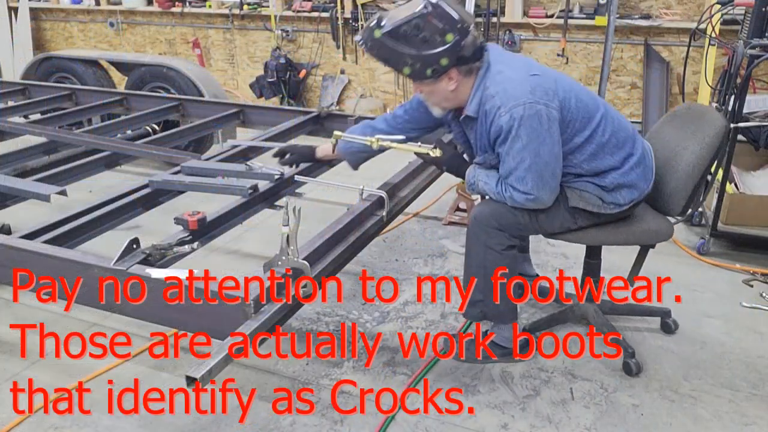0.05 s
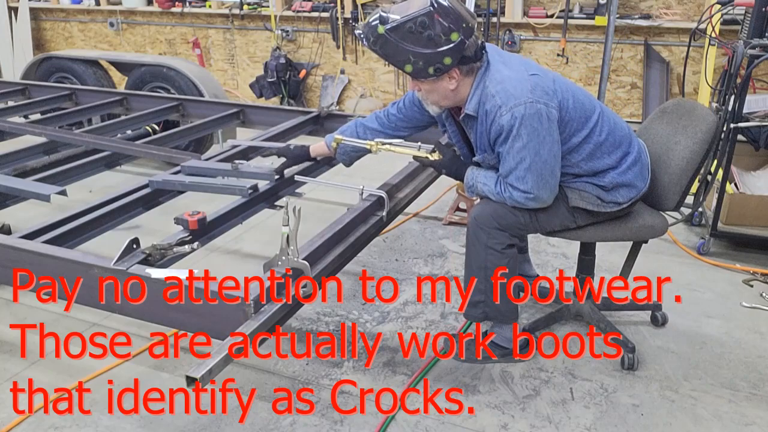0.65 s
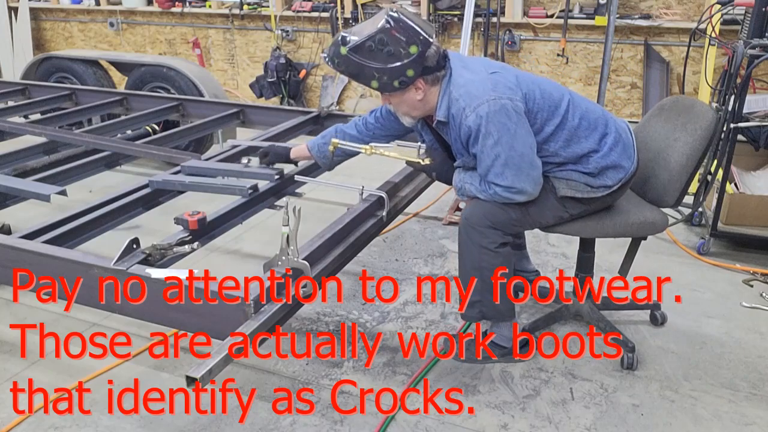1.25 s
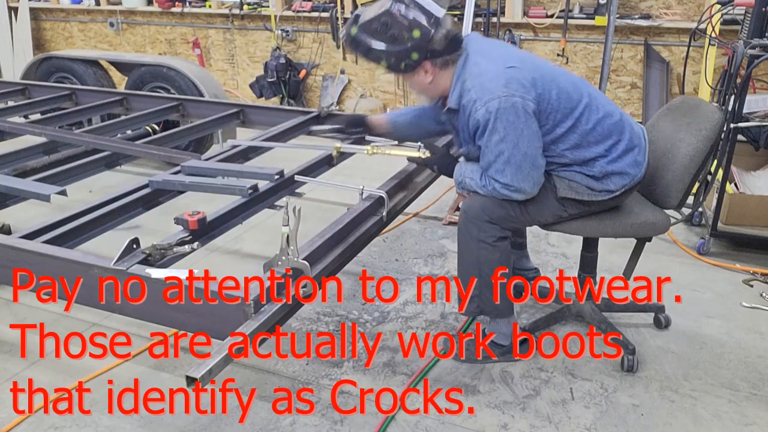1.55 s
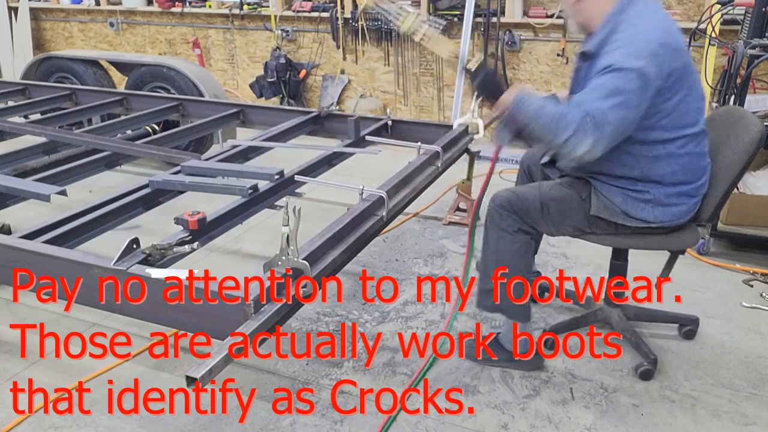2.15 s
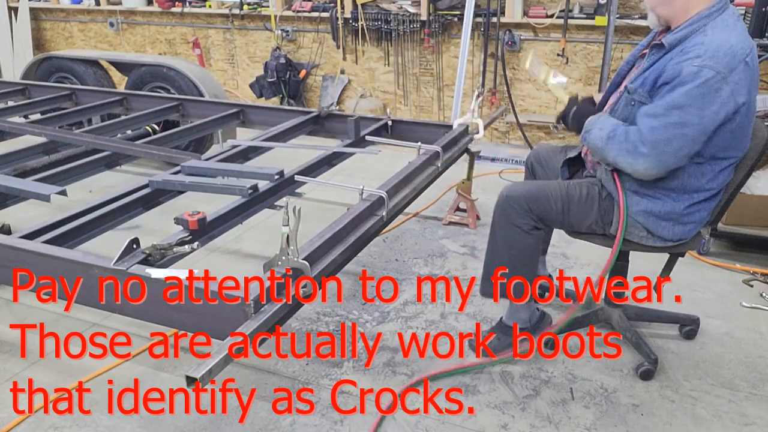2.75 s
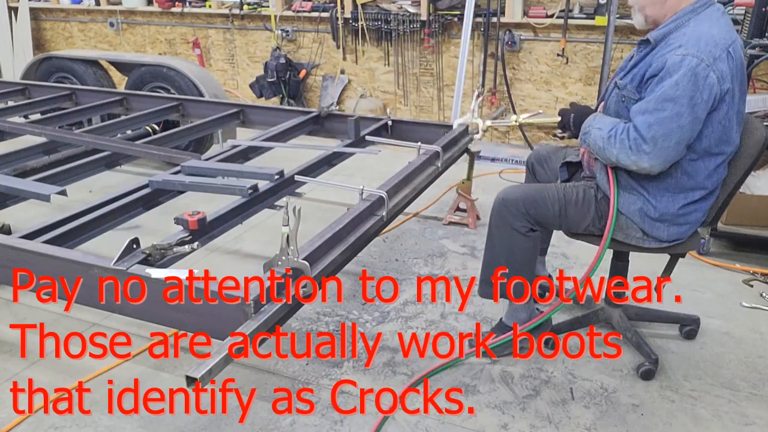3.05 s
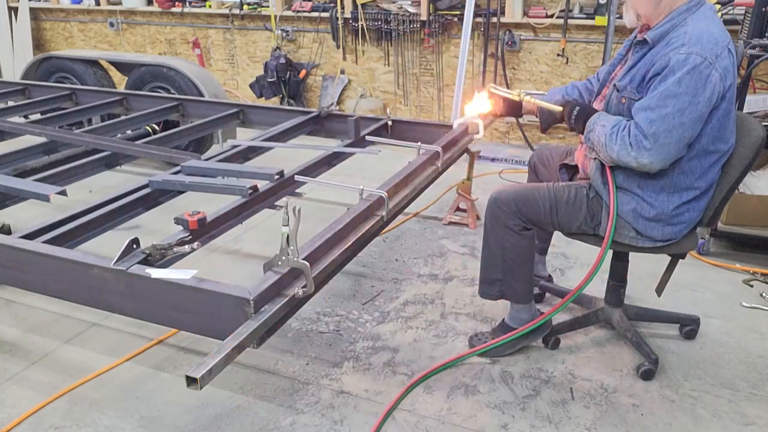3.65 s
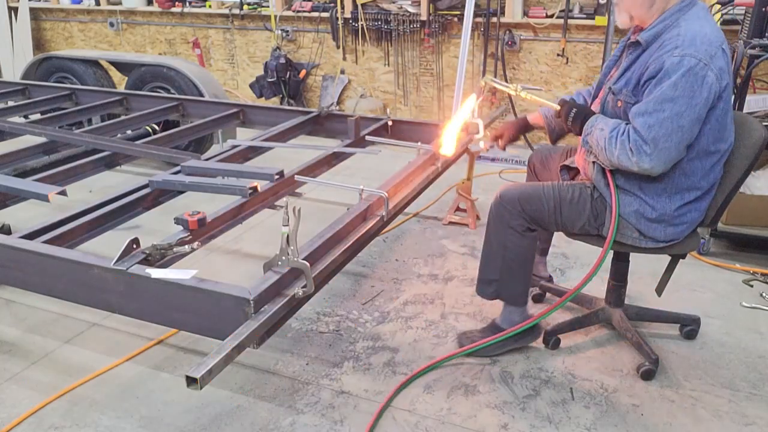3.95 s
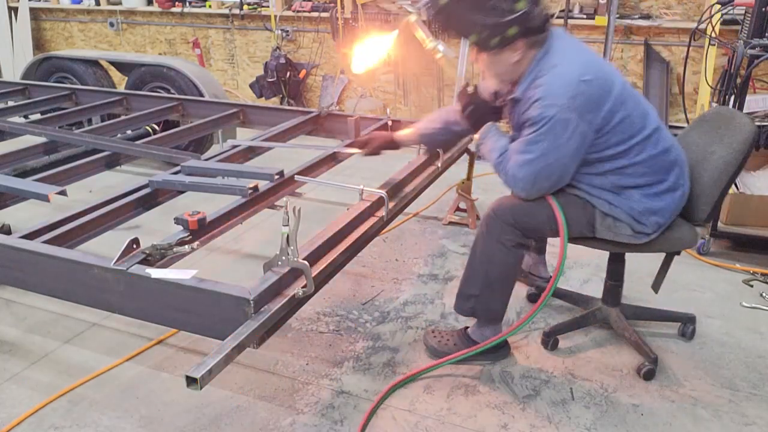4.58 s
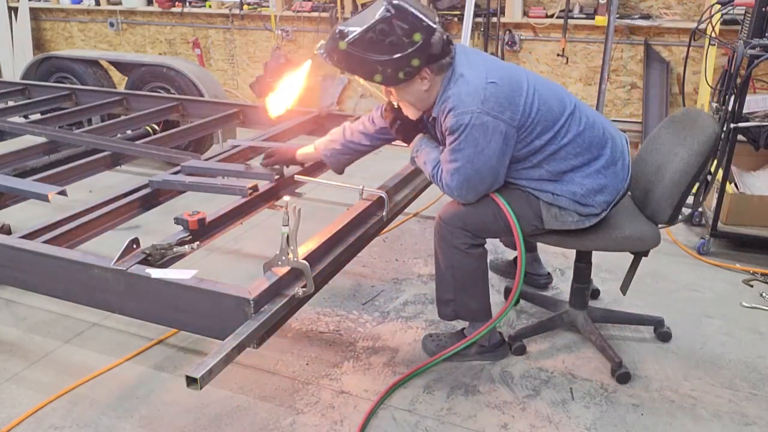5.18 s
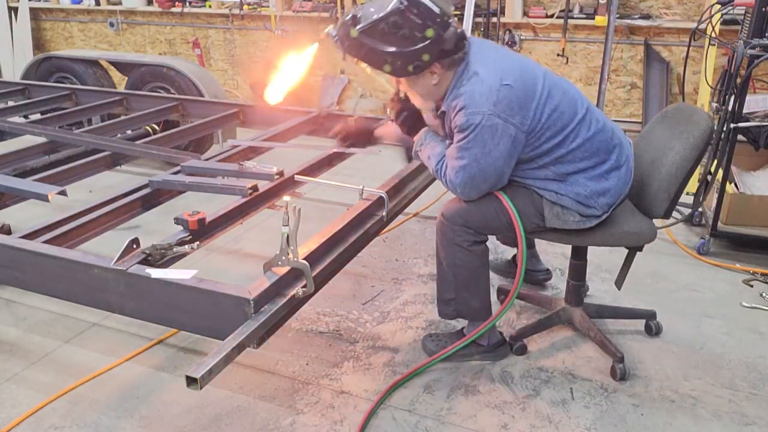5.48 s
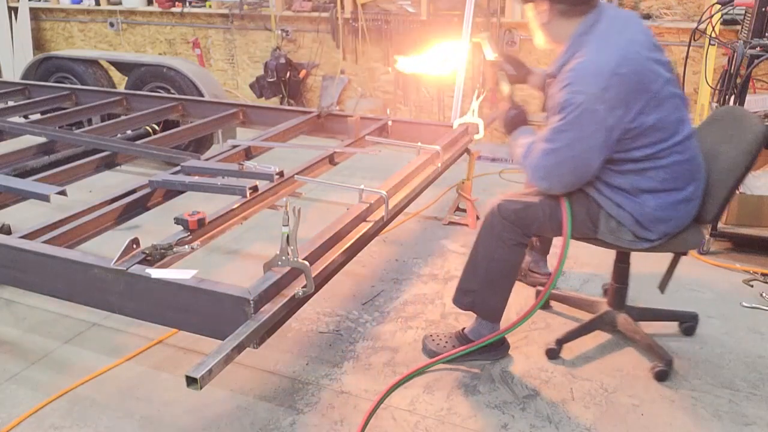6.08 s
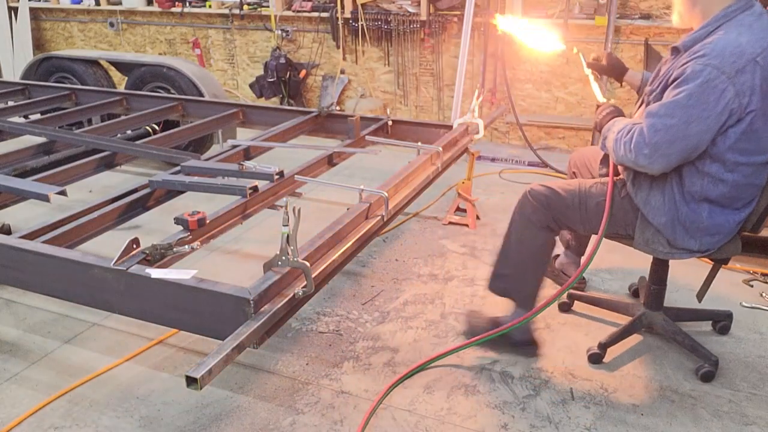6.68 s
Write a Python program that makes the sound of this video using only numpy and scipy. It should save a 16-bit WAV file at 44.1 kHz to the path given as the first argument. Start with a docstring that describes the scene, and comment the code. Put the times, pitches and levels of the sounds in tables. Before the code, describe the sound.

A steel bar clinks in a workshop, then a cutting torch lights with a loud pop, flutters and opens to a rushing hiss.

```python
"""A workshop, heard from a few metres away with plenty of room. A gas hose drags over the floor, a chair
rolls back on its casters, and a steel bar slides and drops ringing on a steel frame while fittings tick.
A flint striker rasps and snaps, and a cutting torch lights with a loud pop. Its loose yellow flame
flutters and roars, the bar is nudged once more, and the valve opens to a rushing hiss."""
import sys
import numpy as np
from scipy import signal
from scipy.fft import rfft, irfft
from scipy.io import wavfile
from scipy.ndimage import uniform_filter1d

SR = 44100
rng = np.random.default_rng(int(sys.argv[2]) if len(sys.argv) > 2 else 0)


def transcribe(signal):
    """Save signal, clipped to [-1, 1], as a 16-bit WAV file at the path in sys.argv[1]."""
    frames = np.atleast_2d(signal).T
    limited = np.clip(frames, -1, 1)
    pcm = np.round(limited * 32767).astype(np.int16)
    wavfile.write(sys.argv[1], SR, pcm)


N = 305270
T = np.arange(N) / SR
RING = T[:SR]  # one second for each hit to ring out

# room tone: (frequency [Hz], level [dB])
ROOM_TONE = [(15, -26.5), (25, -10.5), (49, -3), (108, -13.5), (127, -7), (236, -17), (427, -23.5),
             (4490, -37.5), (11300, -29.5), (16000, -45)]
# sweeps of hose and sleeves, and at 3.9 s the striker's hiss dying away in the room:
# (time [s], length [s], rub [dB], swish [dB])
SWEEPS = [(-.06, 0.63, -68, -66.5), (.9, 0.42, -65, -76), (1.5, 0.048, -50, -46.5),
          (1.62, .08, -48.5, -51.5), (1.75, 0.45, -52, -53), (2.16, .12, -47.5, -46.5),
          (2.48, 0.087, -61, -54), (2.6, 0.23, -60, -64), (2.7, 0.083, -49.5, -49.5),
          (3.9, 0.15, -49.5, -55), (4.135, 0.04, -46, -44), (4.55, 0.39, -54.5, -56.5),
          (4.92, 0.042, -56, -47.5), (5.67, 0.2, -64, -59), (6.75, .09, -41, -40.5)]
# their dull rub and bright swish: (frequency [Hz], level [dB])
RUB_EQ = [(250, -10), (480, -2), (800, -1.5), (1400, -3), (2000, -1.5), (2700, -6.5), (4000, -16)]
SWISH_EQ = [(1180, -31), (2000, -13.5), (3010, -3), (4410, -1), (5780, -3), (6590, 0), (8120, -15.5),
            (11100, -5), (15100, -7), (16000, -28)]

# low rumble of casters and, once lit, of the swelling flame: (time [s], length [s], rumble [dB], grit [dB])
LOW_SWELLS = [(.05, 0.33, -62.5, -59), (1.52, 0.033, -46, -72), (1.75, 0.33, -50, -52.5),
              (2.76, 0.1, -60, -56), (4.42, 0.07, -47, -59), (4.62, 0.4, -50, -49), (5.7, .18, -62, -56.5),
              (5.86, 0.52, -44.5, -43.5)]
# that rumble and the grit on top: (frequency [Hz], level [dB])
LOW_SWELL_EQ = [(21, -47), (35, -19), (70, -1.5), (213, -7.5), (258, -5.5), (291, -2.5), (523, -7.5),
                (591, -10.5), (900, -17.5), (1170, -55), (1980, -120)]
GRIT_EQ = [(700, -24), (1300, -16), (2050, -4.5), (2600, -14.5), (4000, -25)]
# bumps and creaks of the seat: (time [s], level [dB], pitch [Hz], t60 [s])
BUMPS = [(.091, -48, 1735, 0.04), (.108, -50.5, 1720, 0.14), (1.54, -53, 210, 0.98),
         (1.73, -50, 1880, 0.95), (1.86, -53, 370, 0.22), (2.055, -40.5, 75, 0.39),
         (2.06, -47.5, 510, 0.55), (2.668, -58, 2070, 0.35), (2.72, -55.5, 676, 0.47),
         (2.8, -51.5, 1940, 0.79), (2.83, -59, 140, 0.42)]

# pushes that slide the bar over the frame: (time [s], length [s], grind [dB], scratch [dB])
PUSHES = [(.268, 0.14, -38.5, -40), (.40, .26, -49.5, -38), (.66, 0.17, -53, -62.5),
          (1.085, 0.076, -46.5, -33.5), (1.19, 0.053, -45.5, -49.5), (5.125, 0.18, -43.5, -47)]
# hits and bounces: (time [s], bar [dB], frame [dB], contact [0 end to 1 flank], cut-off [Hz])
BLOWS = [(0.2788, -12, -24.5, 0.0047, 1520), (.425, -19.5, -40, 0.35, 10000),
         (1.077, -19.5, -42.5, 0.18, 4940), (1.318, 2, -30, 0.065, 19700), (1.352, -3, -33.5, 0.095, 19900),
         (5.136, -3, -35.5, 0.56, 3240), (5.2805, 0.5, -34, 0.71, 20000), (5.296, -4.5, -37.5, 0.76, 20000)]
# the bar's free ring: (frequency [Hz], t60 [s], struck on its end [dB], struck on its flank [dB])
BAR_MODES = [(684, 1.2, -49, -44), (1200, 1.2, -50, -47), (2169, 0.82, -25.5, -52), (2191, 1.2, -42, -55),
             (2466, 1.2, -52, -47), (3040, 0.88, -41, -47), (3260, 0.94, -50, -42), (3660, 0.68, -44, -42),
             (3905, 0.83, -38, -45), (4225, 0.96, -42, -40), (4560, 0.61, -39, -51), (4845, 0.8, -52, -50),
             (5389, 0.84, -40, -34), (5895, 0.57, -34, -50), (6105, 0.89, -32, -37), (6255, 0.62, -30, -42),
             (6745, 0.59, -34, -44), (6820, 0.97, -28, -52), (7009, 0.58, -47, -39), (7393, 0.63, -34, -40),
             (8076, 0.57, -34, -42), (8419, 0.58, -45, -52), (9551, 0.42, -32, -38),
             (10378, 0.48, -38, -38), (10698, 0.54, -41, -41), (11260, 0.49, -45, -37),
             (12205, 0.53, -45, -44), (12820, 0.56, -41, -41), (15400, 0.69, -55, -51),
             (15738, 0.53, -41, -48)]
# the crack of steel on steel, and the wash of weaker modes in bar and frame: (frequency [Hz], level [dB])
CRACK_EQ = [(200, -29.5), (1000, -10.5), (4000, -5.5), (8000, -2), (11000, 2.5), (15000, 0.5)]
FRAME_EQ = [(60, -33.5), (160, -5), (700, -6.5), (1300, -1), (1850, -3.5), (2300, -0.5), (4400, 0.5),
            (5100, -5.5), (6600, 3.5), (9000, -9.5), (10500, -3), (11800, -13), (13800, -2.5),
            (15000, -1.5)]
# decay of that wash: (frequency [Hz], t60 [s])
FRAME_T60 = [(150, 1.0), (2000, 1), (7000, 0.71), (15000, 0.16)]
# bar modes that sing under friction or ring on after a drop:
# (time [s], frequency [Hz], relative level [dB], swell [s])
SINGING = [(.28, 2191, -45, .01), (.44, 2466, -47, .24), (.47, 9551, -52, .03), (.5, 4845, -51, .2),
           (.5, 3260, -53, .15), (.55, 684, -53, .12), (.575, 2191, -49, .02), (1.1, 4560, -45, .05),
           (1.11, 7009, -47, .06), (1.11, 10698, -45, .06), (1.45, 2169, -42, .1), (5.135, 684, -50, .03),
           (5.135, 1200, -50, .02), (5.14, 3260, -47, .03), (5.15, 5895, -50, .03)]

# the clearest ticks of fittings and hose: (time [s], level [dB])
TICKS = [(1.0572, -46.5), (1.7712, -33.5), (1.786, -40.5), (1.9144, -34), (2.0538, -36), (2.774, -34),
         (3.109, -52), (4.145, -39), (4.8662, -30.5), (4.969, -21.5), (5.9632, -38), (6.0797, -30),
         (6.2103, -29)]
# tone of one tick: (frequency [Hz], level [dB])
TICK_EQ = [(1000, -5), (3000, -5.5), (5000, -3.5), (7200, -3), (9200, -4), (10600, 2.5), (12000, 4),
           (15000, 2)]
TICK_T60 = 0.018

# strokes of the flint over the file: (time [s], length [s], level [dB])
STROKES = [(3.63, 0.047, -50.5), (3.672, 0.079, -38), (3.872, 0.0027, -25), (3.885, 0.053, -41)]
# snaps of the striker's spring: (time [s], level [dB], t60 [s])
SNAPS = [(3.638, -61, 0.066), (3.702, -39, .04), (3.8434, -25.5, 0.036), (3.869, -22, 0.027)]
# ring of its cup and spring: (frequency [Hz], width [Hz], relative level [dB])
STRIKER_MODES = [(7200, 190, -5), (7860, 330, -27), (10400, 230, -10), (12230, 370, -23),
                 (14200, 210, -2.5)]

LIGHT_S = 3.689  # the gas catches
# attack and tail of the pop: (frequency [Hz], level [dB])
POP_CRACK_EQ = [(30, -27), (60, 11), (200, -26), (550, -7), (1500, -22), (5000, -30), (12000, -46)]
POP_TAIL_EQ = [(25, -26), (65, -13), (95, -13.5), (140, -3), (260, -19.5), (450, -7), (770, -20.5),
               (1050, -18.5), (1600, -27.5), (4400, -32.5), (9000, -45.5), (15000, -50)]
# decay of the tail: (frequency [Hz], t60 [s])
POP_T60 = [(60, 0.9), (170, 0.78), (450, 1), (1300, 0.68), (4000, 1), (12000, 0.44)]
# low room modes kicked by the pop: (frequency [Hz], relative level [dB], t60 [s])
BOOM_MODES = [(70.9, 1.5, 0.36), (131.6, -0.5, 0.62), (147.7, 2.5, 0.41), (181.8, -3, 0.54)]
# gas rushing from the tip: (frequency [Hz], level [dB])
HISS_EQ = [(1290, -10), (2200, -4.5), (2690, -7), (2890, -5.5), (3140, -7), (5960, -7.5), (6370, -6),
           (7900, -16), (12300, -10), (15100, -11.5), (16000, -33)]

# the flame's roar, growing as the torch is swung: (time [s], level [dB])
ROAR_LEVEL = [(3.95, -48.5), (4.12, -59), (4.4, -53), (4.53, -45.5), (4.62, -44), (4.72, -42.5),
              (4.85, -41.5), (5.0, -43), (5.13, -45.5), (5.36, -47), (5.63, -47.5), (5.762, -44),
              (5.87, -39), (6.27, -39), (6.6, -40), (6.92, -39.5)]
# its body, tearing edge and low rumble: (frequency [Hz], level [dB])
ROAR_EQ = [(110, -63), (190, -1), (260, -3.5), (335, 1.5), (450, -3.5), (560, -7.5), (720, -8.5),
           (880, -19), (1100, -18.5), (1600, -21.5), (2200, -25.5), (4000, -43)]
TEARING_EQ = [(400, -1.5), (800, 13.0), (1500, 7.0), (2100, -14), (3200, -17.0), (8000, -22)]
RUMBLE_EQ = [(25, -18), (42, -11), (56, -8.5), (66, 3.5), (78, -1.5), (90, -8.5), (115, -3), (128, 5.5),
             (160, 0), (185, -30), (260, -36)]

# tone of the reverb on small metal: (frequency [Hz], level [dB])
REVERB_EQ = [(100, -16), (15000, -1.0)]
# its decay: (frequency [Hz], t60 [s])
REVERB_T60 = [(100, 0.51), (1000, 1), (5000, 0.76), (15000, 0.17)]
# stereo width of the room: (frequency [Hz], side minus mid [dB])
WIDTH = [(60, -7.5), (130, -15.5), (250, -12.5), (500, -8), (1000, -1), (4000, -0.5), (12000, -0.5)]
# stereo balance: (frequency [Hz], left minus right [dB])
BALANCE = [(60, 2), (125, 1), (250, 1.5), (1000, 2), (2000, 2), (4400, 3.5), (8000, 1), (13000, 0.5)]


def amp(db):
    """Decibels to gain."""
    return 10 ** (np.asarray(db) / 20)


def unit(x):
    """Scale to rms 1."""
    return x / np.sqrt(np.mean(x ** 2))


def along(points, hz):
    """Read (frequency [Hz], value) points on a log-frequency axis."""
    f, value = np.transpose(points)
    return np.interp(np.log(np.maximum(hz, 1)), np.log(f), value)


def colour(x, eq):
    """Filter by an EQ curve."""
    n = x.shape[-1]
    return irfft(rfft(x) * amp(along(eq, np.fft.rfftfreq(n, 1 / SR))), n)


def noise(eq, size=N):
    """Coloured noise from all round at rms 1: narrow in the bass, wide in the treble."""
    mid, side = rng.standard_normal((2, size))
    side = colour(side, WIDTH)
    return unit(colour(np.array([mid + side, mid - side]), eq))


def flicker(rate_hz, depth_db):
    """A gain that wanders at random."""
    hold = max(int(SR / rate_hz), 1)
    steps = rng.standard_normal(N)[np.arange(N) // hold]
    return unit(amp(depth_db * unit(uniform_filter1d(steps, hold))))


def fade(t60):
    """Exponential decay, 60 dB down after t60 seconds."""
    return np.exp(-np.log(1000) * RING / t60)


def envelope(s, length, attack_s, t60):
    """A smooth rise from s, a hold until length has passed, then an exponential release."""
    rise = np.sin(np.pi / 2 * np.clip((T - s) / attack_s, 0, 1)) ** 2
    return rise * np.exp(-np.log(1000) * np.maximum(T - s - length, 0) / t60)


def gestures(rows, attack_s, t60):
    """One gain curve for each level column of the rows; overlapping gestures add in power."""
    power = sum(np.outer(amp(db), envelope(s, length, attack_s, t60)) ** 2 for s, length, *db in rows)
    return np.sqrt(power)


def tail(eq, t60s):
    """Countless modes set off at once: noise whose bands each die at their own rate."""
    bands = np.geomspace(40, 16000, 10)
    spectrum, f = rfft(noise(eq, SR)), np.fft.rfftfreq(SR, 1 / SR)
    return sum(irfft(spectrum * along(np.c_[bands, share], f), SR) * fade(along(t60s, hz))
               for hz, share in zip(bands, np.eye(len(bands))))


def add(out, s, sound):
    """Mix a sound in at s seconds."""
    i = max(int(s * SR), 0)
    out[:, i:i + sound.shape[-1]] += sound[..., :N - i]


def through(x, response):
    """Play x through a response scaled to unit energy."""
    wet = signal.fftconvolve(np.atleast_2d(x), response, axes=1)[:, :N]
    return wet / np.sqrt(np.sum(response ** 2) / 2)


def soften(x, hz):
    """A soft contact leaves out the treble."""
    return signal.sosfilt(signal.butter(2, min(hz, .45 * SR), fs=SR, output="sos"), x)


def pan(x, left_lag):
    """Pan by delay: the left channel trails the right by left_lag samples."""
    return np.array([np.roll(x[0], left_lag), x[1]])


def room_tone(level_db=-76.5):
    """The still air of the shop, a faint low bed."""
    return amp(level_db) * noise(ROOM_TONE)


def rub_and_swish(rattles_per_s=5.4):
    """Hose and cloth rub and swish, the striker's hiss dies away; faint random rattles ride the swish."""
    rub, _ = gestures(SWEEPS, attack_s=0.062, t60=0.84)
    _, swish = gestures(SWEEPS, attack_s=0.062, t60=0.69)
    rattle, tick = np.zeros((2, N)), noise(TICK_EQ, SR) * fade(TICK_T60)
    out = rub * noise(RUB_EQ) * flicker(40, 1.6)
    out += swish * noise(SWISH_EQ) * flicker(250, 1.4)
    for when, softness in rng.random((int(rattles_per_s * N / SR), 2)):
        add(rattle, when * N / SR, amp(-3 - 2 * softness) * tick)
    return out + swish * rattle


def low_swells():
    """Gritty low rumble: casters rolling on concrete and, once lit, the swelling flame."""
    rumble, grit = gestures(LOW_SWELLS, attack_s=0.091, t60=0.53)
    low = rumble * noise(LOW_SWELL_EQ) * flicker(30, 0.78)
    return low + grit * noise(GRIT_EQ) * flicker(90, 3.2)


def chair_bumps():
    """The seat bumps and creaks, each time a dying band of noise around one pitch."""
    out = np.zeros((2, N))
    for s, db, hz, t60 in BUMPS:
        body = [(hz / 3, -45), (hz / 1.25, -15), (hz, 0), (hz * 1.25, -15), (hz * 3, -45)]
        add(out, s, amp(db) * noise(body, SR) * fade(t60))
    return out


def stereo_phases(apart_rad=1.2):
    """Starting phases of a mode: left and right sit at different points of its standing wave."""
    start, side = rng.random(2)
    return 2 * np.pi * start + np.sign(side - .5) * apart_rad * np.array([[0], [1]])


def detune(spread_hz):
    """Phase drift of a mode that the loosely lying bar pulls off pitch, anew every 20 ms."""
    off_hz = np.interp(RING, np.arange(51) / 50, rng.standard_normal(51))
    return 2 * np.pi * spread_hz * np.cumsum(off_hz) / SR


def frame_ring(spacing_hz=32):
    """A dense wash of modes; steel favours some frequencies, carving narrow peaks and valleys."""
    wash, f = tail(FRAME_EQ, FRAME_T60), np.fft.rfftfreq(SR, 1 / SR)
    ripple = np.clip(np.interp(f / spacing_hz, np.arange(SR), rng.standard_normal(SR)), -2, 1.3)
    ripple_db = 7 * ripple * along([(300, 0.1), (2500, 0.24)], f)  # the low modes merge with the room
    lead = SR // 50  # space for the filter's pre-ring, trimmed off
    return irfft(rfft(np.roll(wash, lead, axis=1)) * amp(ripple_db), SR)[:, lead:]


def bar_ring(contact, wander_hz=5, split_hz=14, twin_gain=0.67, damping_t60=3):
    """The contact point sets the mix of modes; the frame damps them and gives each a weaker twin."""
    out = np.zeros((2, SR))
    for hz, t60, end_db, flank_db in BAR_MODES:
        starts = np.array([stereo_phases(), stereo_phases()])
        pair_hz = [hz, hz + split_hz * rng.normal()]
        phases = np.array([2 * np.pi * f * RING + detune(wander_hz) for f in pair_hz])
        mode, twin = np.sin(phases[:, None] + starts)
        out += amp(end_db + contact * (flank_db - end_db)) * (mode + twin_gain * twin) * fade(t60)
    return out * fade(damping_t60)


def bar_sing(near_hz, swell_s, wander_hz=6, damping_t60=5):
    """The nearest mode of the bar swells and fades, singing under friction or ringing on after a drop."""
    hz, t60, *_ = min(BAR_MODES, key=lambda mode: abs(mode[0] - near_hz))
    swell = np.minimum(RING / swell_s, 1)
    release = np.exp(-np.log(1000) * np.maximum(RING - swell_s, 0) / t60)
    wave = np.sin(2 * np.pi * hz * RING + stereo_phases() + detune(wander_hz))
    return swell * release * fade(damping_t60) * flicker(33, 0.62)[:SR] * wave


def steel_bar(crack_db=-25, singing_db=2, grind_hz=1700, scratch_hz=2800):
    """Blows crack at the contact; they and the tiny slips of sliding ring the same bar and frame."""
    out, frame = np.zeros((2, N)), frame_ring()
    for s, bar_db, frame_db, contact, cut_hz in BLOWS:
        crack = amp(crack_db) * noise(CRACK_EQ, SR) * fade(t60=0.028)
        add(out, s, soften(amp(bar_db) * (bar_ring(contact) + crack), cut_hz))
        add(out, s, soften(amp(frame_db) * frame, cut_hz))
    for s, hz, db, swell_s in SINGING:
        add(out, s, amp(db + singing_db) * bar_sing(hz, swell_s))
    grind, scratch = gestures(PUSHES, attack_s=0.037, t60=0.34)
    slips = rng.standard_normal(N) * flicker(300, 4.6)
    sharp = signal.sosfilt(signal.butter(1, scratch_hz, "high", fs=SR, output="sos"), slips)
    force = grind * unit(soften(slips, grind_hz)) + scratch * unit(sharp)
    return out + amp(-1) * through(force, frame) + amp(-3) * through(force, bar_ring(contact=0.18))


def fittings():
    """Small metal parts knock together in short, bright ticks."""
    out = np.zeros((2, N))
    for s, db in TICKS:
        add(out, s, amp(db) * noise(TICK_EQ, SR) * fade(TICK_T60))
    return out


def reverb(x, wet_db=-4):
    """The shop answers a sound with a bright, diffuse tail."""
    return x + amp(wet_db) * through(x.mean(axis=0), tail(REVERB_EQ, REVERB_T60))


def striker(floor_db=-12):
    """The flint rasps across the file and the spring snaps, both ringing the cup."""
    f = np.arange(500, 17000, 50)
    peaks = sum(amp(db) / np.hypot(1, 2 * (f - hz) / width) for hz, width, db in STRIKER_MODES)
    floor = amp(floor_db + along(TICK_EQ, f))  # broad tick tone between the peaks
    cup_eq = np.c_[f, 20 * np.log10(np.hypot(peaks * f / (f + 2000), floor))]
    out = gestures(STROKES, attack_s=0.0028, t60=0.13) * noise(cup_eq) * flicker(900, 2.2)
    for s, db, t60 in SNAPS:
        add(out, s, amp(db) * noise(cup_eq, SR) * fade(t60))
    return out


def pop(crack_db=-16, boom_db=-21, tail_db=-22):
    """The gathered gas goes off at once: a short crack, a boom in the room's low modes, a long tail."""
    crack = amp(crack_db) * noise(POP_CRACK_EQ, SR) * fade(t60=0.044)
    boom = sum(amp(db) * np.sin(2 * np.pi * hz * RING) * fade(t60) for hz, db, t60 in BOOM_MODES)
    build = 1 - np.exp(-RING / 0.018)  # standing waves need a few crossings of the room
    out = np.zeros((2, N))
    add(out, LIGHT_S, crack + amp(boom_db) * build * boom + amp(tail_db) * tail(POP_TAIL_EQ, POP_T60))
    return out


def gas_hiss(low_db=-63, open_db=-42, valve_s=5.7, turn_s=0.56):
    """Gas rushes from the tip, faint from the moment it lights and much louder once the valve opens."""
    flow = amp(low_db) * (T > LIGHT_S) + amp(open_db) * envelope(valve_s, N / SR, turn_s, t60=1)
    return flow * noise(HISS_EQ) * flicker(200, 0.59)


def flame(full_roar_db=-42, tearing_db=-52, rumble_db=-45):
    """Eddies in the flame flutter its roar; it rumbles, tears and brightens when swung hard."""
    s, db = np.transpose(ROAR_LEVEL)
    roar = amp(np.interp(T, s, db, left=-140))
    swing = roar / amp(full_roar_db)
    eddies = flicker(55, 2.1)
    body = roar * noise(ROAR_EQ) * eddies
    tearing = swing ** 2 * noise(TEARING_EQ) * eddies * flicker(200, 0.54)
    rumble = swing ** 1.7 * noise(RUMBLE_EQ) * flicker(25, 2.2)
    return body + amp(tearing_db) * tearing + amp(rumble_db) * rumble


def scene():
    """The bar to the right, the worker and torch to the left, over the room tone."""
    steel, air = steel_bar(), room_tone()
    worker = rub_and_swish() + low_swells() + chair_bumps() + reverb(fittings() + striker())
    torch = pop() + gas_hiss() + flame()
    return pan(steel, left_lag=4) + pan(worker + torch, left_lag=-6) + air


def record(dry, low_cut_hz=36, high_cut_hz=16100):
    """A phone's sound: the left a little louder, the deepest bass and the very top cut away."""
    left = colour(dry[0], [(hz, db / 2) for hz, db in BALANCE])
    right = colour(dry[1], [(hz, -db / 2) for hz, db in BALANCE])
    stereo = signal.sosfilt(signal.butter(3, low_cut_hz, "high", fs=SR, output="sos"), [left, right])
    return signal.sosfilt(signal.ellip(10, .2, 80, high_cut_hz, fs=SR, output="sos"), stereo)


dry = scene()
out = record(dry)
transcribe(out)
```